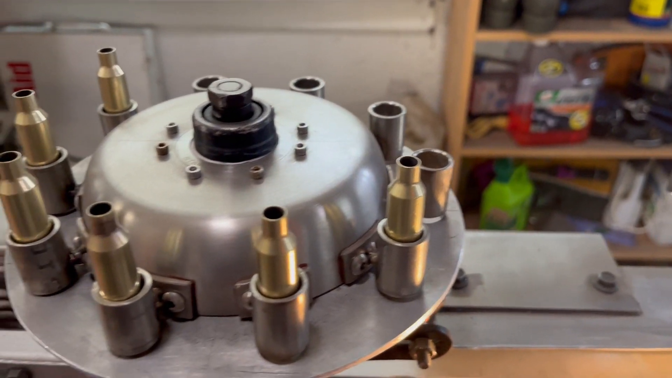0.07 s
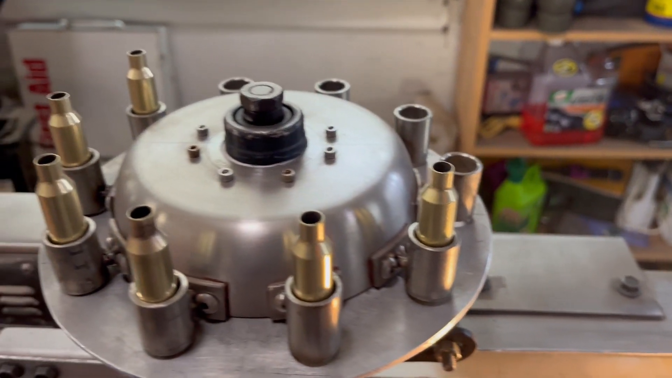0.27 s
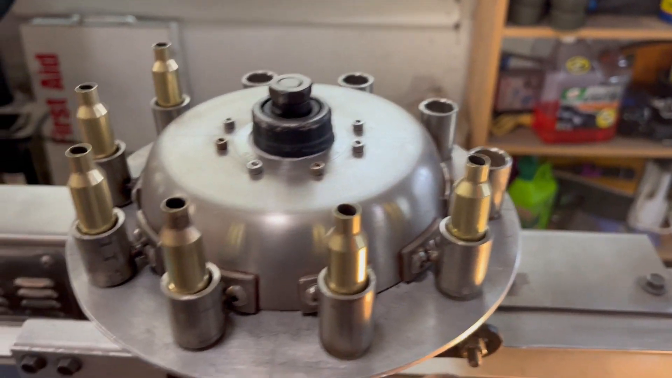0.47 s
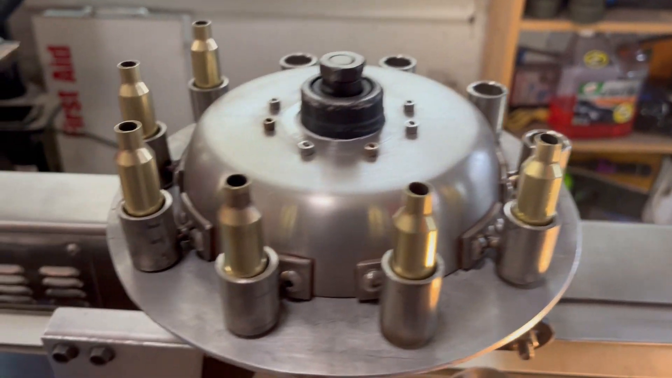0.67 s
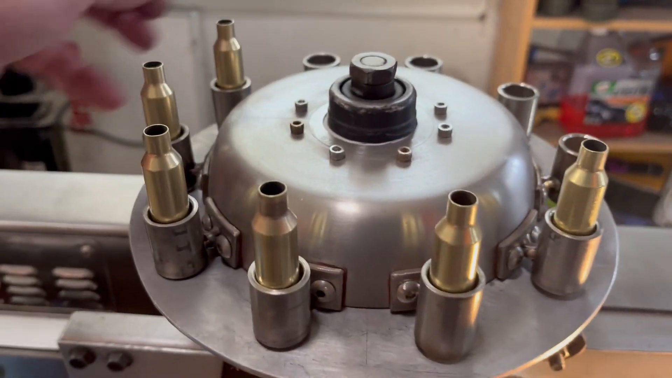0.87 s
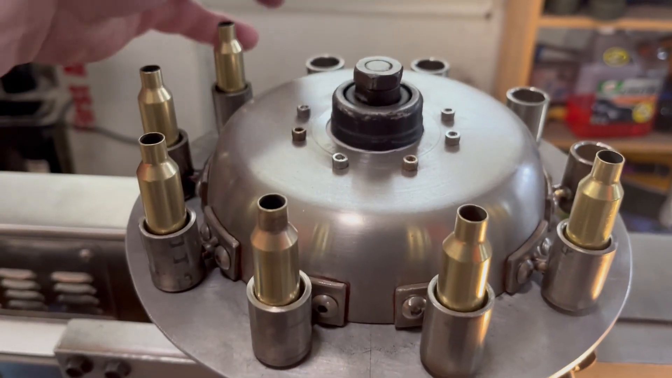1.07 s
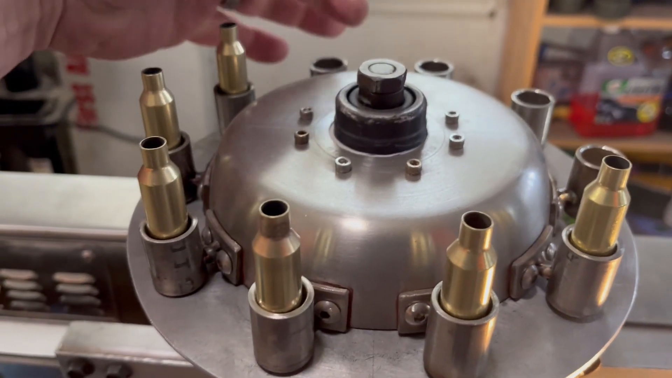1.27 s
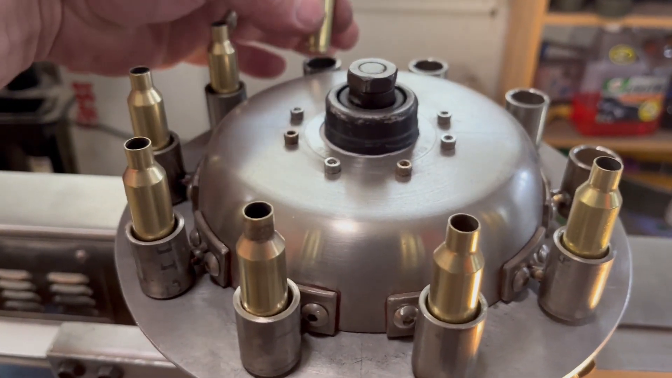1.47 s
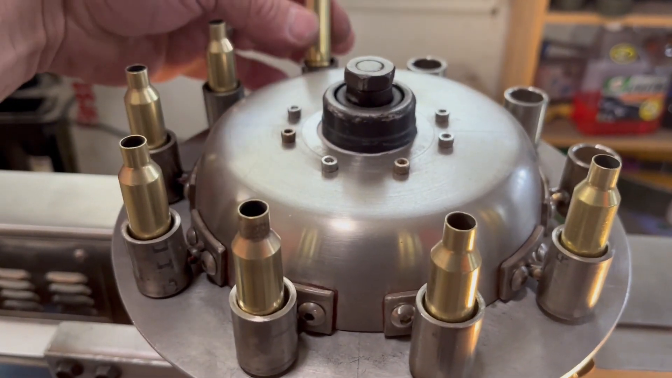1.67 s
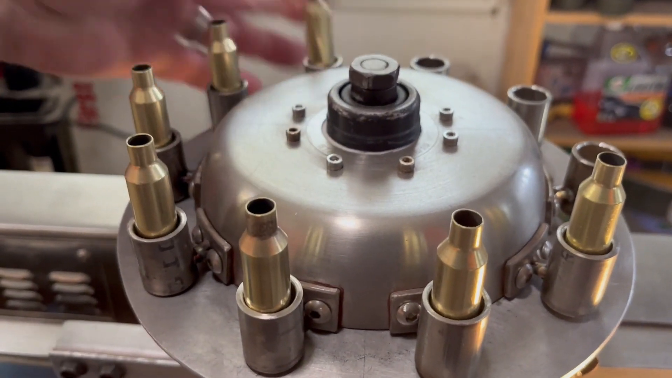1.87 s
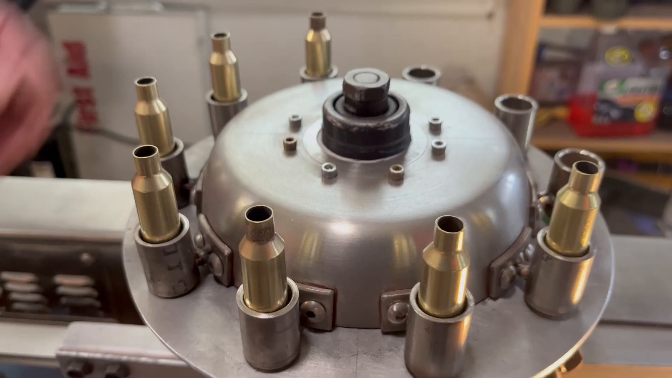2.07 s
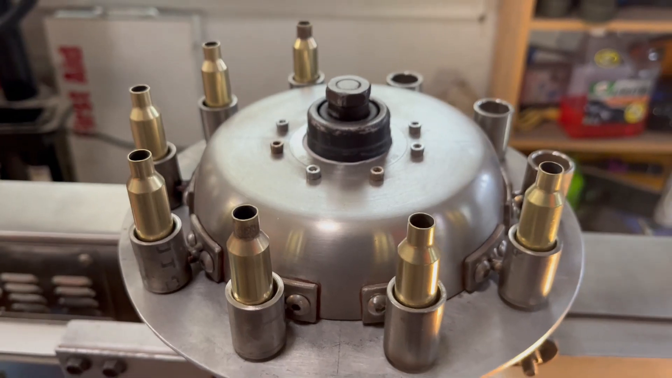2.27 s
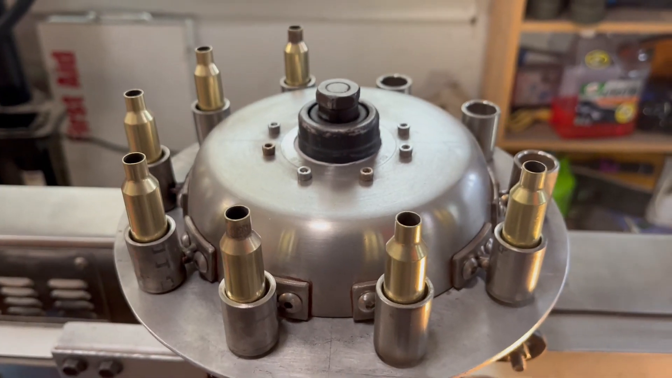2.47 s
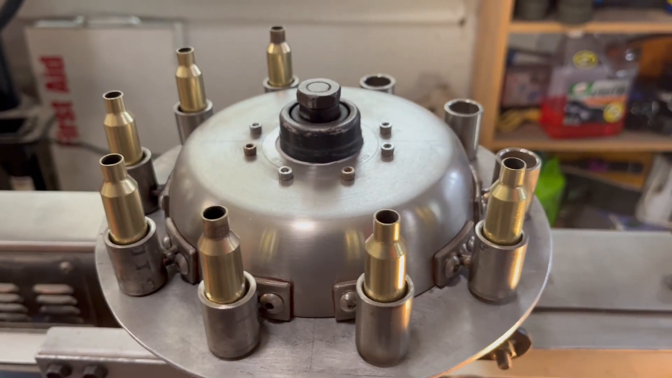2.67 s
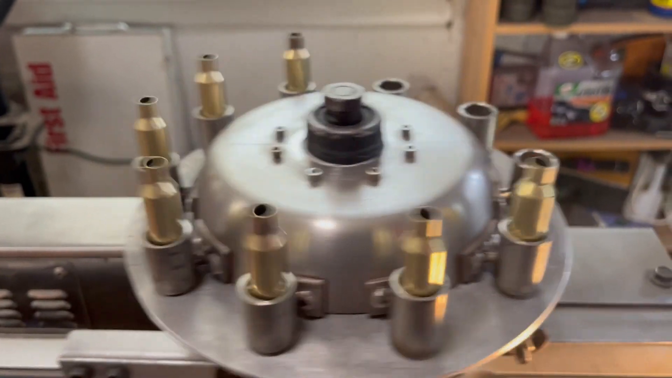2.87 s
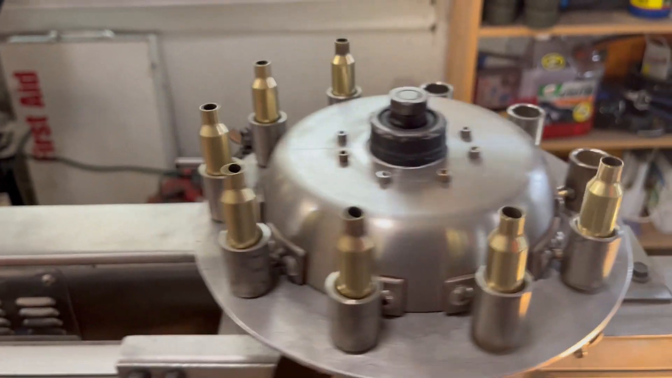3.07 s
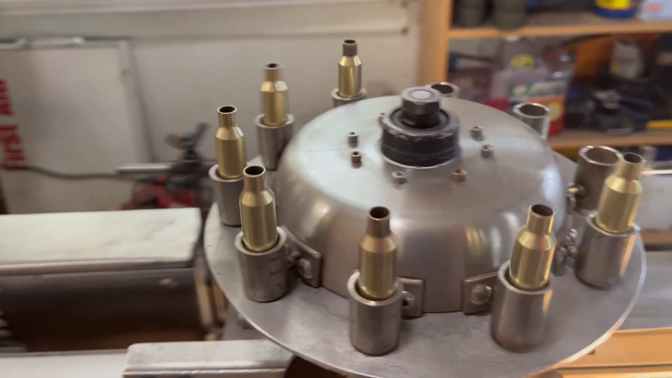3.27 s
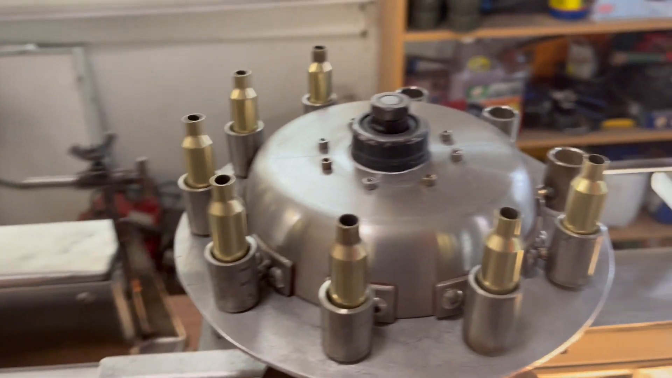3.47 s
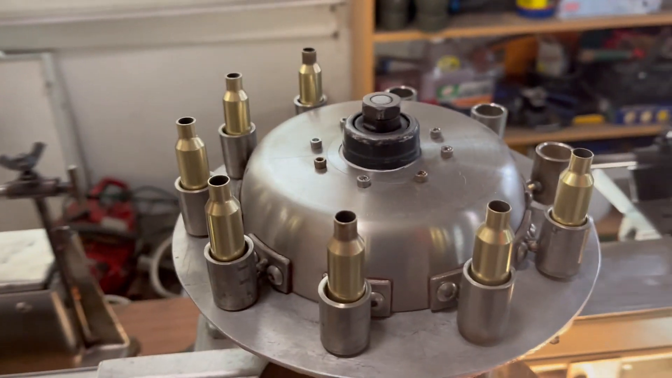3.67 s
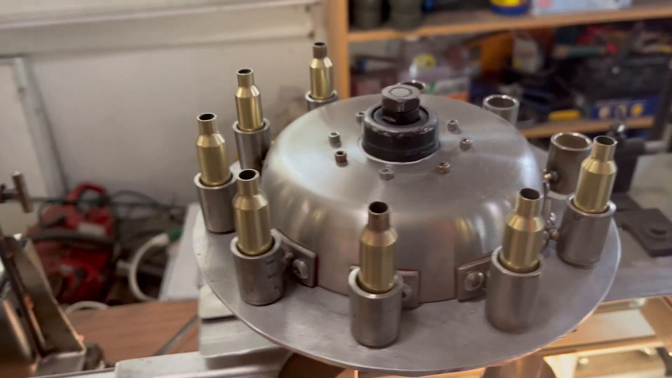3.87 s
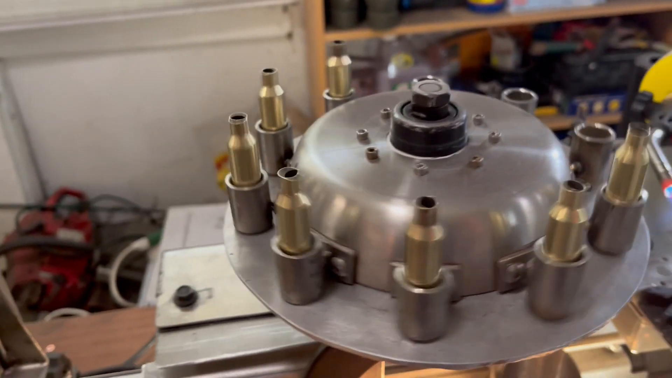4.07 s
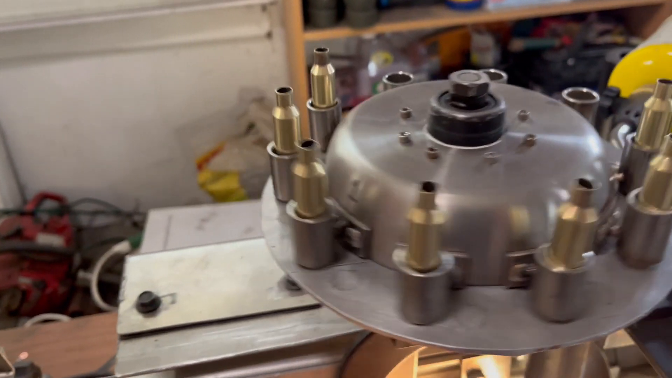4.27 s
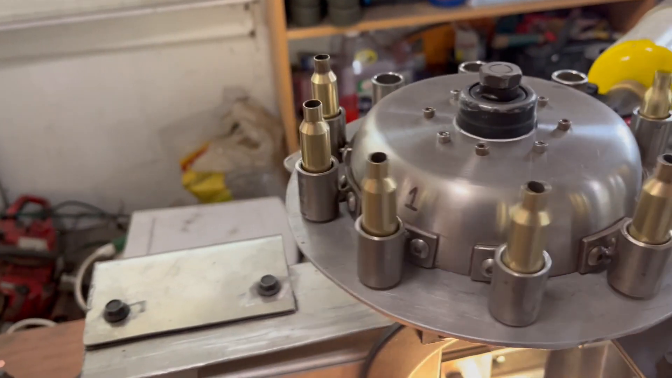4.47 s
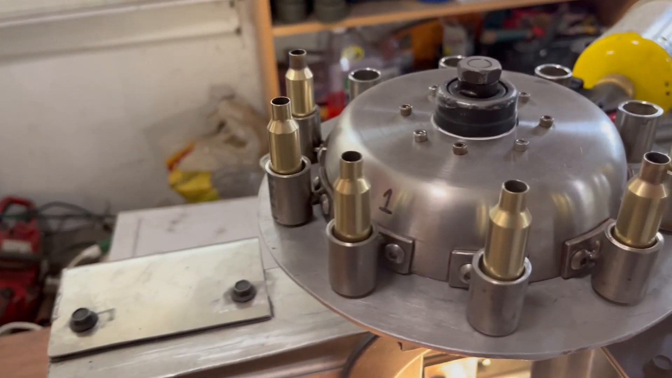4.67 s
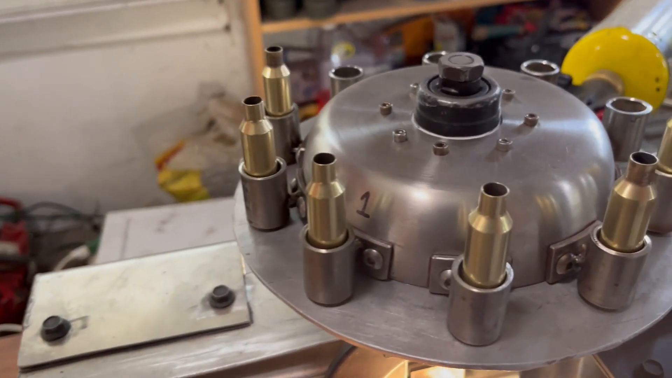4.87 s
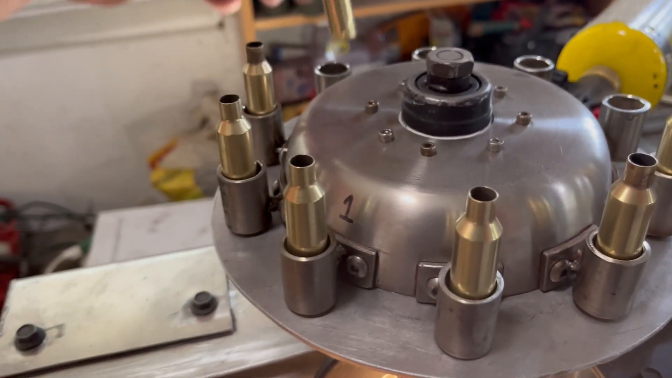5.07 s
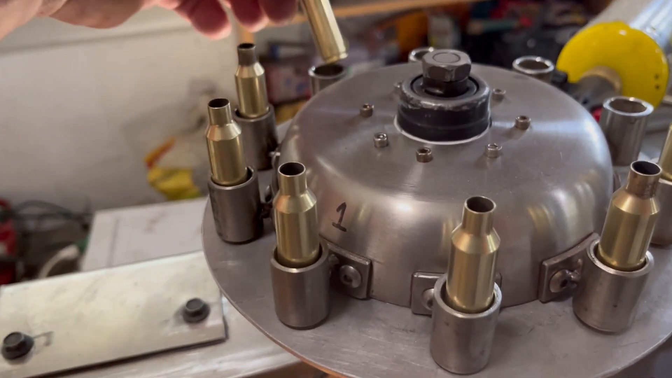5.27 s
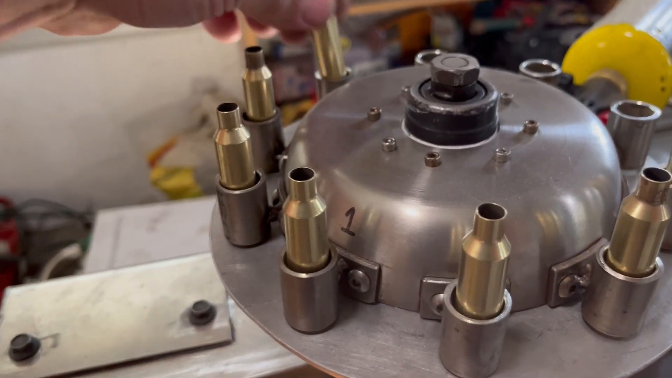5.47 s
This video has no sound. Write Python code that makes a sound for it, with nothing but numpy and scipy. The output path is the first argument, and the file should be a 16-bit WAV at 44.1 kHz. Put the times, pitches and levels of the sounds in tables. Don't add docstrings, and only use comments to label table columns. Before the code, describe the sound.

Close stereo pickup in a small workshop with steady airy fan hiss and faint buzz. Brass cases are dropped into steel cups with sharp ringing clinks, then a small electric motor jerks on, hums and rumbles for about two seconds, shaking the cases into a bright rattle as the wheel moves on. After it stops, more cases clink into place.

```python
import sys
import numpy as np
from scipy import signal
from scipy.fft import rfft, irfft
from scipy.io import wavfile
from scipy.ndimage import uniform_filter1d

SR = 44100
rng = np.random.default_rng(int(sys.argv[2]) if len(sys.argv) > 2 else 0)


def wav_out(sig):
    wavfile.write(sys.argv[1], SR, np.round(np.clip(np.atleast_2d(sig).T, -1, 1) * 32767).astype(np.int16))


def amplitude_ratio(level_db):
    exponent = np.asarray(level_db, float) / 20
    return 10 ** exponent


N = 242991

# (time [s], level [dB])
FAN_LEVEL = [(0, -37.5), (.6, -38.5), (1.8, -37.5), (4.6, -36), (4.9, -35), (5.51, -36)]
# (frequency [Hz], density [dB per Hz])
FAN_AIR = [(30, -30), (100, -1.5), (250, -7), (600, -2.5), (1200, -6.5), (2000, -13), (4000, -14),
           (7000, -16.5), (10000, -17.5), (13000, -30), (15500, -19.5)]
# (frequency [Hz], width [Hz], height [dB])
FAN_HOUSING = [(984, 70, 8.5), (1591, 130, 14.5), (664, 160, -10), (774, 29, -4), (1180, 100, -4),
               (3075, 113, 10.5), (3500, 37, -8), (4550, 44, 13.5), (4700, 220, -7), (5150, 500, 4),
               (6490, 61, 11.5), (12000, 300, 13.5)]
# (frequency [Hz], level [dB])
FAN_BUZZ = [(243, -60), (490.5, -61), (728, -58.5), (849, -54), (975, -57), (1590, -55), (1747, -49),
            (612, -62), (1100, -56), (5080, -64)]
# (frequency [Hz], lead [rad])
FAN_LEAD = [(0, 0), (780, -2.7), (1810, -3.0), (2240, -4.4), (3190, -5.8), (3960, -4.2), (5680, -8.3),
            (6290, -7.3), (11100, -12.2), (13000, -12.9), (14600, -15.7), (16100, -15.7)]
# (frequency [Hz], lead [rad])
FAN_LATE_LEAD = [(0, 0), (690, -1.2), (2840, 0.2), (3360, -0.4), (3880, 0.9), (6200, -0.2), (7670, -9.3),
                 (8870, -9.5), (11100, -12.4), (13000, -12.8), (14600, -15.7), (16100, -15.6)]
# (frequency [Hz], lead [rad])
NEAR_LEAD = [(0, 0), (300, -.2), (600, -1), (950, .2), (2580, 0), (3880, .8), (6200, -1.1), (7670, -2.3),
             (8400, -3.14), (9390, -3.7), (11000, -6.1), (12600, -7.1), (14900, -9.2), (16100, -9.5)]
# (frequency [Hz], likeness [0 to 1])
PORT_LIKENESS = [(60, .99), (250, .93), (500, .6), (1000, .6), (2000, .62), (4000, .6), (7000, .85),
                 (8400, .975), (12000, .88)]
# (frequency [Hz], left minus right [dB])
PORT_LEAN = [(60, 0), (300, 0), (740, -4.5), (1300, -2.5), (2000, 0), (4000, 1.5), (8000, 0)]
# (frequency [Hz], time to fall 60 dB [s])
ROOM_T60 = [(100, 0.19), (1000, 0.58), (4000, 0.68), (14000, 0.012)]

# (multiple of the hum [count], shaft turns added [count], level to the hum [dB])
MOTOR_TONES = [(1, -2, -18), (1, -3, -25), (2, -2, -17), (2, -1, -16), (2, 0, -14), (2, 1, -15),
               (3, -2, -15), (3, -1, -13), (3, 2, -19), (4, 0, -20), (4, 3, -26), (7, -1, -19)]
# (time [s], load [dB], lower shaft wobble to the hum [dB], upper shaft wobble to the hum [dB])
MOTOR_RUN = [(2.76, -9, -25, -25), (2.85, 9.5, -1, -6), (3.0, 1.5, -6, -15), (3.3, 0, -7.5, -17),
             (3.5, 0.5, -4, -13), (3.93, .5, -5, -6), (4.1, 1.5, -4, -16), (4.3, 1.5, -11, -14),
             (4.58, 4.5, -6, -14), (4.8, -24, -35, -35)]
# (frequency [Hz], density [dB per Hz])
RUMBLE_COLOUR = [(40, -51), (70, 5), (110, 10.5), (160, 6), (230, 2.5), (330, 4.5), (480, 1.5), (650, -11),
                 (1200, -26)]
# (frequency [Hz], density [dB per Hz])
BRUSH_COLOUR = [(500, -0.5), (1000, 8.5), (2000, -3), (3000, 0.5), (5000, -3.5), (8000, -12), (12000, -27),
                (15000, -23)]

# (frequency [Hz], level [dB], time to fall 60 dB [s])
AIR_MODES = [(890, 1, 0.042), (914, 12, 0.23), (1053, 11.5, 0.34), (1161, -4, 0.64), (1374, 18, 0.022)]
# (frequency [Hz], level [dB], time to fall 60 dB [s])
WHEEL_MODES = [(1720, -38.5, 0.046), (1810, -35, 0.29), (1909, 0, 0.35), (2028, 12, 0.12), (2375, -1, 0.26),
               (2456, 10, 0.072), (2580, -25, 0.016), (2940, -9, 1)]
# (frequency [Hz], level [dB], time to fall 60 dB [s])
WALL_MODES = [(3190, -11, 0.77), (3250, 6.5, 0.6), (3410, 12, 0.35), (3894, 9, 0.26), (3844, 8, 0.36),
              (4500, -13, 0.02), (4890, 17.5, 0.081), (5080, 0, 0.061), (5200, -28, 0.24),
              (6320, 20, 0.036), (6640, -3, 0.014), (7400, 1, 0.065)]
# (frequency [Hz], level [dB], time to fall 60 dB [s])
MOUTH_MODES = [(9470, 25, 0.09), (10450, -46, 0.035), (10700, 2, 0.061), (11100, 3, .06),
               (12240, 34, 0.057), (14000, 8, .2), (11900, -14, 0.47), (12500, 28, 0.19),
               (12600, -23, 0.15)]

# (time [s], level [dB], frequency [Hz])
THUDS = [(1.601, -43, 93), (1.945, -31.5, 144), (2.382, -30, 470), (2.394, -28, 603), (2.409, -36.5, 117),
         (2.789, -16.5, 135), (4.09, -16, 152), (4.391, -24.5, 119), (4.483, -15.5, 216), (4.49, -19, 75.6),
         (4.559, -25, 99), (4.709, -31, 95), (5.151, -23, 126), (5.19, -32, 114), (5.39, -26.5, 184),
         (5.449, -27, 135), (5.48, -27, 107)]
# (time [s], shaking [dB])
SHAKES = [
    [(2.78, -47), (2.86, -19), (2.964, -44), (3.096, -41), (3.32, -38)],
    [(4.08, -19), (4.132, -25.5), (4.252, -25), (4.41, -23.5), (4.48, -44), (4.628, -34), (4.7, -61)],
]
# (air [dB], wheel [dB], mouth [dB])
SHAKE_PARTS = [
    (-11, -7.5, -16),
    (-5, -3.5, -6),
]

# (time [s], level [dB], frequency [Hz])
LIP_PINGS = [(2.807, -37, 12900), (2.807, -37, 13350), (2.8514, -23, 12930), (2.866, -27, 13380),
             (2.895, -31, 13050), (2.895, -30, 13230), (3.0495, -36, 13100), (3.2144, -40, 12950),
             (3.245, -40, 13100), (4.099, -13.5, 12920), (4.125, -28, 13000), (4.1757, -31, 13300),
             (4.19, -32, 13020), (4.2745, -18, 12970), (4.336, -26, 12980), (4.39, -26, 13050),
             (4.4174, -19, 12990), (4.449, -28, 13100), (4.452, -27, 13400), (4.499, -17.5, 12850),
             (4.5126, -35, 12840), (4.5753, -18.5, 12850), (4.59, -25, 13200)]
# (time [s], level [dB], frequency [Hz])
MOUTH_PINGS = [(1.924, -23, 6272), (1.924, -13, 6650), (1.924, -8.5, 7854), (2.866, -6, 7840),
               (4.1014, -18, 10140), (4.137, -20, 6330), (4.272, -21, 12000)]
# (time [s], level [dB], frequency [Hz])
NECK_PINGS = [(1.9225, -11, 4895), (2.8754, -13, 4890), (4.139, -21, 4720), (4.19, -28, 4920),
              (4.287, -22, 5250), (4.305, -14, 5150), (4.322, -16, 5260), (4.565, -33, 4200)]
# (time [s], level [dB], frequency [Hz])
WALL_PINGS = [(1.685, -36, 3370), (1.924, -16, 3800), (1.924, -23, 3560), (1.9, -26, 3250),
              (2.808, -17.5, 3390), (2.8654, -17, 3545), (2.9327, -18, 3365), (2.96, -25, 3340),
              (2.985, -33, 3330), (3.134, -28, 3310), (3.171, -36, 3250), (3.222, -24.5, 3270),
              (3.259, -36, 3390), (4.18, -20, 2930), (4.222, -21, 3170), (4.244, -18, 3200),
              (4.262, -16, 3264), (4.29, -14, 3190), (4.325, -13.5, 3355), (4.398, -20, 3200),
              (4.415, -12.5, 3190), (4.455, -26, 3500), (4.4969, -17, 3700), (4.519, -29, 3250),
              (4.56, -27, 3175), (5.295, -30, 3400)]
# (time [s], level [dB], frequency [Hz])
WHEEL_PINGS = [(4.084, -14, 2223), (4.111, -26, 1856), (4.195, -25, 1950), (4.3, -17, 2030),
               (4.3061, -20, 2300), (4.32, -10, 2240), (4.337, -10.5, 2302), (4.557, -15.5, 1796),
               (4.6165, -22, 1826), (4.67, -30, 1830)]
# (time [s], level [dB], frequency [Hz])
AIR_PINGS = [(1.583, -27, 1100), (1.66, -29.5, 1020), (2.393, -34, 964), (2.829, -17.5, 1280),
             (4.317, -20, 1100), (4.341, -14, 1190), (4.386, -23, 955), (5.141, -22.5, 965),
             (5.301, -26, 990), (5.328, -18.5, 974), (5.383, -12.5, 967), (5.453, -21, 990)]
# (time [s], level [dB], frequency [Hz])
STOPPED_PINGS = [(1.58, -26, 2140), (1.58, -23, 4060), (1.58, -22, 4980), (1.731, -24, 4600),
                 (1.733, -24, 4070), (2.394, -31, 2410), (2.83, -24, 2000), (4.086, -6, 2940),
                 (4.09, -14, 2500), (4.086, -7, 6130), (4.274, -2, 3190), (4.285, -2, 3190),
                 (4.352, -12, 3580), (4.422, -6.5, 3930), (4.4502, -6.5, 3520), (4.486, -7, 4210),
                 (4.559, -5, 4390), (4.559, -13, 4870), (5.139, -10.5, 3910), (5.139, -17, 4300)]
PING_T60_S = 0.29, 0.11, 0.074, 0.17, 0.15, 0.091, 0.037
PING_RISE_S = 0.00091, .001, .001, 0.0043, .002, 0.0021, 0.0027

# (time [s], wall [dB], air and wheel to the wall [dB], mouth to the wall [dB],
# favoured wall pitch [Hz])
DROPS = [(1.5797, -19, -4, -19, 4500), (1.6864, -28, -4.5, -11, 3500), (1.732, -26.5, -4, -26, 4300),
         (1.812, -25, -5, -4, 3800), (1.85, -26, -6, -25, 4300), (1.8726, -25.5, -4.5, -13, 4300),
         (1.8994, -17.5, -6, -13, 3830), (1.9095, -20, 0.5, -9, 3160), (1.922, -4.5, -12, -4.5, 3900),
         (2.3923, -43.5, 13, -12, 3040), (5.1385, -11.5, -12, -3, 3970), (5.3293, -19, -6.5, -29, 3700),
         (5.3828, -2, -15.5, -10, 4760), (5.452, -10.5, -9.5, -3, 5600), (5.5024, -18.5, -7, -21, 3870)]
# (time [s], wall [dB], air and wheel to the wall [dB], mouth to the wall [dB])
JERKS = [(2.7859, -22, -0.5, -17), (2.808, -16, -7, -20), (2.852, -13, -5, -5), (2.8655, -5, -20, -10),
         (2.8755, -7, -18, -11), (2.8925, -16, -6, -9), (3.0497, -45, 1, 6), (3.1385, -23, -5, -24),
         (3.1712, -24, -22, -27), (3.2144, -24.5, 1, -18)]
# (time [s], wall [dB], air and wheel to the wall [dB], mouth to the wall [dB],
# favoured wall pitch [Hz])
STEPS = [(4.0766, -13, 3.5, -2, 3030), (4.0842, -5, 0.5, -5.5, 3060), (4.101, -10.5, -3, -4, 3000),
         (4.1364, -14.5, -3.5, -18, 4500), (4.173, -25, -18, 4, 3500), (4.2185, -27, -12, 3, 3300),
         (4.224, -26, -12, -4, 3300), (4.2723, -19, 2, 4, 3300), (4.291, -17.5, 1, -6, 3500),
         (4.3037, -12.5, 2.5, -24, 3500), (4.3213, -6.5, -7, -8, 3830), (4.3394, -13.5, 6, -2, 3300),
         (4.352, -15.5, 1, -9, 3500), (4.379, -15, -3, -2, 3700), (4.3904, -15.5, -9, -1, 4500),
         (4.4207, -19, -20, 2, 3700), (4.45, -19, -27, -3, 3600), (4.486, -12, 4, -6, 3500),
         (4.4967, -5.5, -11, -5, 3570), (4.5115, -16.5, 0, -4, 3500), (4.558, -6, -3.5, -17, 4300),
         (4.574, -14, -0.5, -9, 3500), (4.6159, -17, 3, -9, 3500), (4.6654, -19.5, -3.5, -28, 5400)]
# (air [dB], wheel [dB])
LOW_PARTS = [
    (-2, -3),
    (0.5, -3),
    (-5, 0.5),
]

WHINE_HZ, WHINE_DB, WHINE_FADE_S = 3510, -55, 0.52
HUM_HZ, HUM_DB = 120, -26.5
SWITCH_ON_S, PULL_IN_S, SWITCH_OFF_S = 2.748, 0.13, 4.38
PULL_IN_DB, COAST_DB_PER_S = -24, 113
RUMBLE_DB, RUMBLE_SHARE, BRUSH_DB = -31.5, 0.4, -36.5
SHAFT_HZ, SHAFT_START = 22.2, .734
THUD_T60_S, THUD_DULLING = 0.36, 0.83
FULL_BLOW_HZ, DULLING_OCT_PER_DB = 4300, 0.26
FREE_DB = -30


def evened(x):
    return x / np.sqrt(np.mean(x ** 2) + 1e-20)


def read(points, hz):
    f, value = np.transpose(points)
    return np.interp(np.log(hz + 1), np.log(f + 1), value)


def follow(rows):
    s, *columns = np.transpose(rows)
    t = np.arange(N) / SR
    gate = uniform_filter1d(1. * (t > s[0]) * (t < s[-1]), size=400)
    return gate, *(np.interp(t, s, c) for c in columns)


def add(mix, s, sound):
    part = mix[round(s * SR):][:len(sound)]
    part += sound[:len(part)]


def noise(shape, humps=(), patchy_db=2.0):
    hz = np.fft.rfftfreq(2048, 1 / SR)
    a, b = rng.standard_normal((N // 512 + 5, len(hz), 2, 2)).T
    patches = uniform_filter1d(a[0] ** 2, size=12, axis=0)
    patches = evened(uniform_filter1d(patches, size=8, axis=1) - 1)
    db = read(shape, hz) + sum(g / (1 + (2 * (hz - f) / w) ** 2) for f, w, g in humps)
    grains = (a + 1j * b) * amplitude_ratio(db[:, None] + patchy_db * patches)
    return evened(signal.istft(grains, nperseg=2048, noverlap=1536)[1][:, :N])


def wander(hz):
    low = signal.butter(2, hz, fs=SR, output="sos")
    return evened(signal.sosfilt(low, rng.standard_normal(N)))


def ports(pair, lead):
    hz = np.fft.rfftfreq(N, 1 / SR)
    a, b = rfft(pair)
    same = np.clip(read(PORT_LIKENESS, hz), 0, 1)
    turn = np.exp(.5j * np.interp(hz, *np.transpose(lead)))
    lean = amplitude_ratio(read(PORT_LEAN, hz) / 2)
    left = a * turn * lean
    right = (same * a + np.sqrt(1 - same ** 2) * b) / turn / lean
    return irfft([left, right], N)


def room(x, wet_db=-9):
    hz, s, z = signal.stft(rng.standard_normal((2, SR // 2)), SR, nperseg=256)
    tail = signal.istft(z * amplitude_ratio(-60 * s / read(ROOM_T60, hz)[:, None]), SR, nperseg=256)[1]
    tail *= amplitude_ratio(wet_db) / np.linalg.norm(tail[0])
    turn = np.tanh(3 * evened(uniform_filter1d(rng.standard_normal(129), size=5)))
    tail[0, 128] += 1
    tail[1, :256] += np.roll(irfft(1j * turn), 128)
    return signal.fftconvolve(x[None], tail, axes=1)[:, 128:N + 128]


def ring(modes, free_db, centre_hz=0, spread_db=3, crack_db=1.5, held=0.18, detune=0.0062, top=1.087):
    t = np.arange(SR // 5) / SR
    hz, db, t60 = np.transpose(modes)[:, :, None]
    luck = rng.standard_normal((2, len(modes), 1))
    edges = np.array([hz.min() * 0.82, hz.max() * top])
    if centre_hz:
        db = db - 12 * abs(np.log2(hz / centre_hz))
        edges = centre_hz * np.array([.6, 1.7])
    grip_s = 3.9 / np.sqrt(edges.mean())
    fade = amplitude_ratio(-60 * t / np.minimum(t60 * held, grip_s)) + amplitude_ratio(free_db - 60 * t / t60)
    tones = amplitude_ratio(db + spread_db * luck[0]) * np.sin(2 * np.pi * hz * (1 + detune * luck[1]) * t)
    band = signal.butter(3, np.minimum(edges, SR / 2.2), "band", fs=SR, output="sos")
    crack = evened(signal.sosfilt(band, rng.standard_normal(len(t))))
    crack = crack * amplitude_ratio(crack_db - 60 * t / (0.74 * grip_s))
    return (tones * fade).sum(0) / tones.sum(0).std() + crack


def fan():
    t = np.arange(N) / SR
    buzz = np.zeros(N)
    for hz, db in FAN_BUZZ:
        phase = 2 * np.pi * (hz * t + rng.random()) + 0.27 * wander(9.8)
        buzz += amplitude_ratio(db + 3.4 * wander(4.8)) * np.sin(phase)
    whine_db = WHINE_DB - 6.9 * (t / WHINE_FADE_S) ** 2
    buzz += amplitude_ratio(whine_db) * np.sin(2 * np.pi * WHINE_HZ * t + 0.4 * wander(7.4))
    buzz = amplitude_ratio(43.5) * buzz * [[1], [.7]]
    level = amplitude_ratio(follow(FAN_LEVEL)[1])
    early = ports(level * (noise(FAN_AIR, FAN_HOUSING, patchy_db=2.0) + buzz), FAN_LEAD)
    late_humps = [(hz, 0.22 * width, 1.0 * db) for hz, width, db in FAN_HOUSING]
    late_humps += [(810, 230, 4.6), (2020, 400, 5.0)]
    late = ports(level * (noise(FAN_AIR, late_humps) + 0.4 * buzz), FAN_LATE_LEAD)
    swing = np.clip((t - 2.8) / 1.6, 0, 1)
    return np.sqrt(1 - swing) * early + np.sqrt(swing) * late


def thuds():
    out, t = np.zeros(N), np.arange(SR // 2) / SR
    for s, db, hz in THUDS:
        band = signal.butter(1, [hz * 0.78, hz * 1.08], "band", fs=SR, output="sos")
        shudder = evened(signal.sosfilt(band, rng.standard_normal(len(t))))
        t60 = THUD_T60_S * (120 / hz) ** THUD_DULLING
        add(out, s, amplitude_ratio(db - 1.5 - 60 * t / t60) * shudder * np.minimum(t / 0.0038, 1))
    return out


def motor():
    t = np.arange(N) / SR
    on, load_db, lower_db, upper_db = follow(MOTOR_RUN)
    hum_db = PULL_IN_DB * np.clip(1 - (t - SWITCH_ON_S) / PULL_IN_S, 0, 1)
    hum_db = hum_db - COAST_DB_PER_S * np.maximum(t - SWITCH_OFF_S, 0)
    hum = 2 * np.pi * HUM_HZ * t
    shaft = 2 * np.pi * (SHAFT_HZ * (t - 2.77) + SHAFT_START)
    tones = np.cos(hum)
    for m, k, db in MOTOR_TONES:
        tones += amplitude_ratio(db + 3.3 * wander(7.7)) * np.cos(round(m) * hum + round(k) * shaft + 0.89 * wander(4.3))
    wobble = amplitude_ratio(lower_db) * np.cos(hum - shaft) + amplitude_ratio(upper_db) * np.cos(hum + shaft)
    tones = np.sqrt(2) * on * amplitude_ratio(HUM_DB) * (amplitude_ratio(hum_db) * tones + wobble)
    throb = 1 + 0.12 * np.cos(shaft + 4.3)
    rumble_db = RUMBLE_DB + RUMBLE_SHARE * load_db + 0.5 * np.minimum(load_db + 0.5, 0)
    rumble = amplitude_ratio(rumble_db) * noise(RUMBLE_COLOUR, patchy_db=1.5)
    brushes = amplitude_ratio(BRUSH_DB + load_db) * noise(BRUSH_COLOUR, patchy_db=1.0)
    return tones * [[1], [.3]] + on * throb * (rumble + brushes)


def rattle(per_s=500, uneven_db=5.5):
    out = np.zeros(N)
    for rows, over_db in zip(SHAKES, SHAKE_PARTS):
        gate, db = follow(rows)
        for case in range(6):
            strength = amplitude_ratio(uneven_db * np.minimum(rng.exponential(1, N), 3))
            taps = (rng.random(N) < per_s / 6 / SR) * strength
            for modes, g in zip((WALL_MODES, AIR_MODES, WHEEL_MODES, MOUTH_MODES), (0, *over_db)):
                answer = ring(modes, free_db=1.0, spread_db=2.0, detune=0.00623)
                out += signal.oaconvolve(taps * gate * amplitude_ratio(db + g - 21.5), answer)[:N]
    return out


def pings(lumpy_db=3.0, lump_s=0.00806):
    out, t = np.zeros(N), np.arange(SR // 3) / SR
    kinds = (LIP_PINGS, MOUTH_PINGS, NECK_PINGS, WALL_PINGS, WHEEL_PINGS, AIR_PINGS, STOPPED_PINGS)
    for rows, t60, rise_s in zip(kinds, PING_T60_S, PING_RISE_S):
        for s, db, hz in rows:
            brush = evened(np.interp(t, np.arange(100) * lump_s, np.r_[0, rng.standard_normal(99)]))
            tone = np.sin(2 * np.pi * hz * t + 0.5 * brush)
            twin = 0.5 * np.sin(2 * np.pi * hz * (1 + 0.0043 * rng.standard_normal()) * t)
            fade = amplitude_ratio(db - 5.5 - 60 * t / t60) + amplitude_ratio(db - 15.0 - 60 * t / (0.44 * t60))
            add(out, s, fade * amplitude_ratio(lumpy_db * brush) * (tone + twin) * np.minimum(t / rise_s, 1))
    return out


def clinks():
    out, t = np.zeros(N), np.arange(800) / SR
    for rows, (air_db, wheel_db) in zip((DROPS, JERKS, STEPS), LOW_PARTS):
        for s, db, low_db, mouth_db, *pitch in rows:
            chatter = (rng.random(800) < .09) * rng.standard_normal(800) * np.exp(-(t / 0.0094) ** 2)
            chatter[0] = 3.4
            touch = chatter * np.exp(-t / 0.0016)
            centre_hz = pitch[0] if pitch else FULL_BLOW_HZ * 2 ** (DULLING_OCT_PER_DB * db)
            low = amplitude_ratio(air_db) * ring(AIR_MODES, -31.0) + amplitude_ratio(wheel_db) * ring(WHEEL_MODES, -33)
            body = ring(WALL_MODES, FREE_DB, centre_hz=centre_hz) + amplitude_ratio(low_db) * low
            mouth = ring(MOUTH_MODES, -40, crack_db=12.5, top=0.88)
            add(out, s, amplitude_ratio(db - 7.0) * signal.fftconvolve(chatter / np.linalg.norm(chatter), body))
            mouth = signal.fftconvolve(touch / np.linalg.norm(touch), mouth)
            add(out, s, amplitude_ratio(db + mouth_db - 14.5) * mouth)
    return out


def scene():
    blows = room(clinks() + thuds(), wet_db=-15.5) + room(pings() + rattle(), wet_db=-16)
    return fan() + ports(motor() + blows, NEAR_LEAD)


def top_cut(x):
    return signal.sosfilt(signal.butter(12, 16510, fs=SR, output="sos"), x)


def record(dry):
    cut = signal.butter(3, 45, "high", fs=SR, output="sos")
    mix = 0.97 * np.tanh(signal.sosfilt(cut, dry) / 1.213)
    return top_cut(mix)


dry = scene()
out = record(dry)
wav_out(out)
```